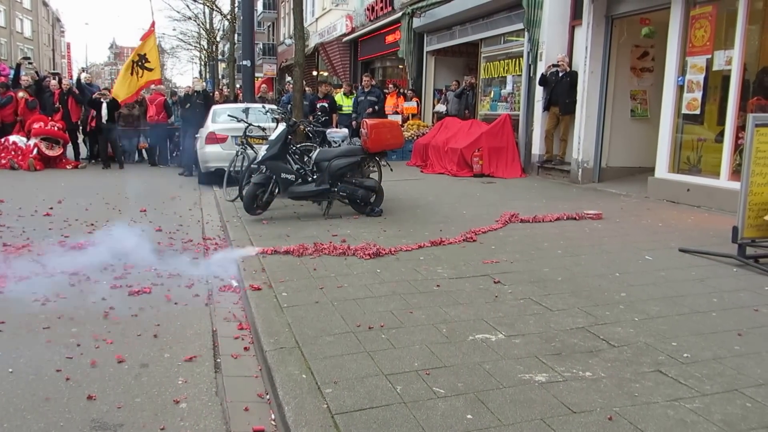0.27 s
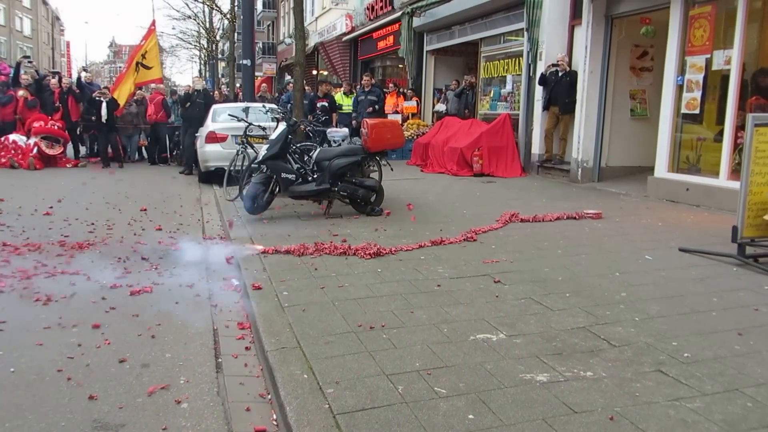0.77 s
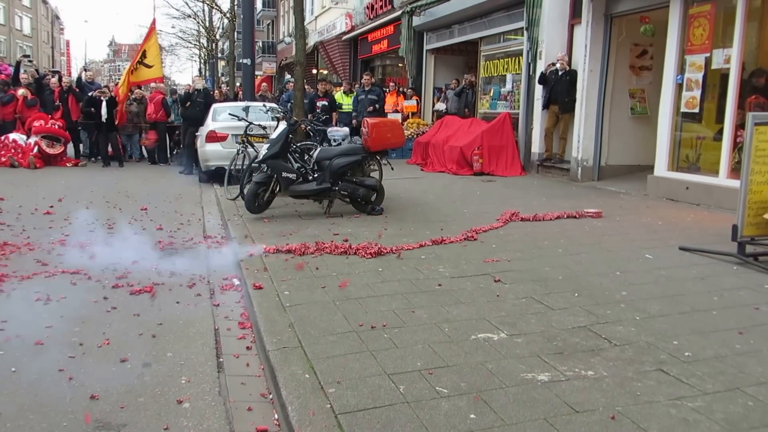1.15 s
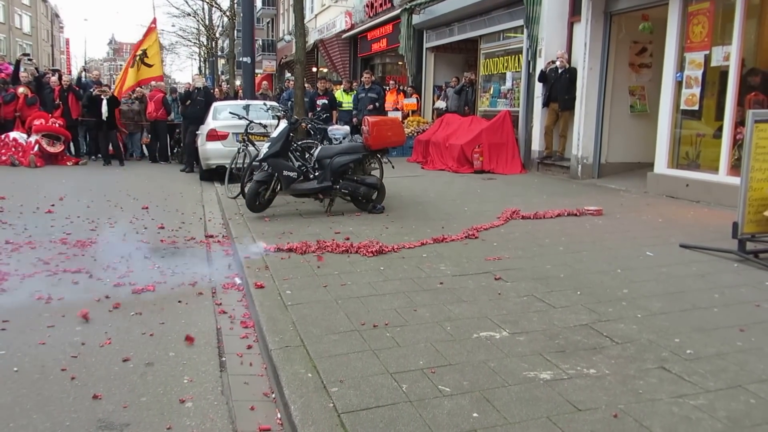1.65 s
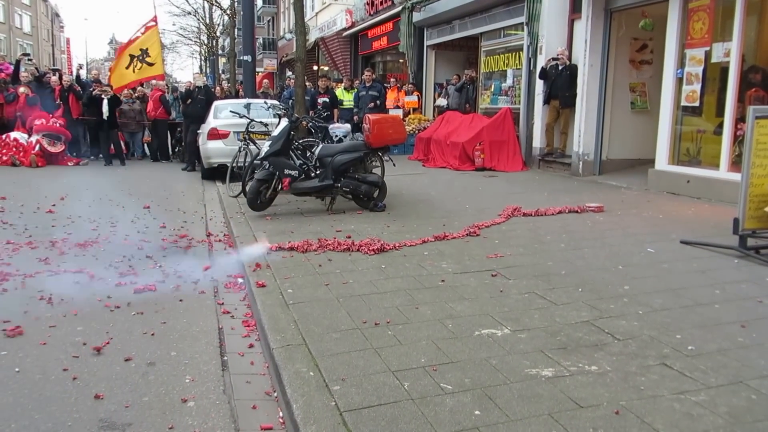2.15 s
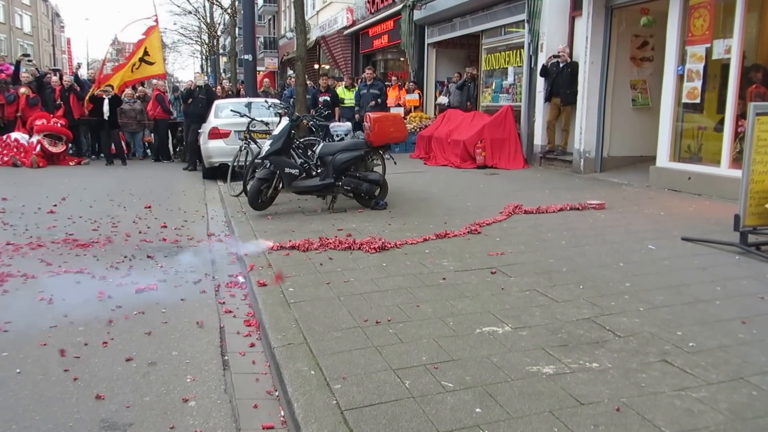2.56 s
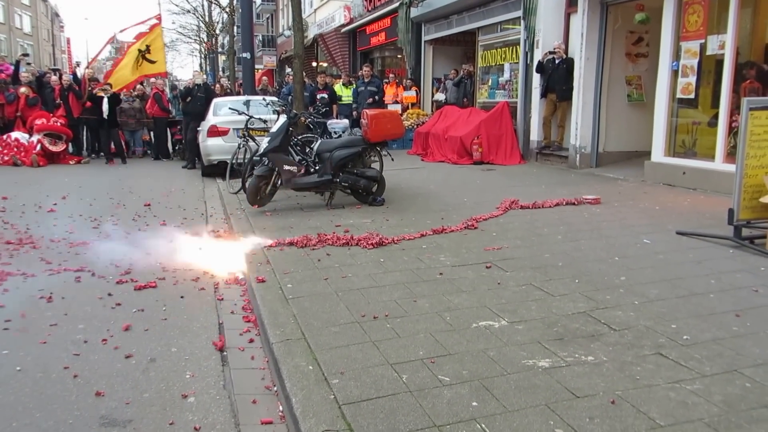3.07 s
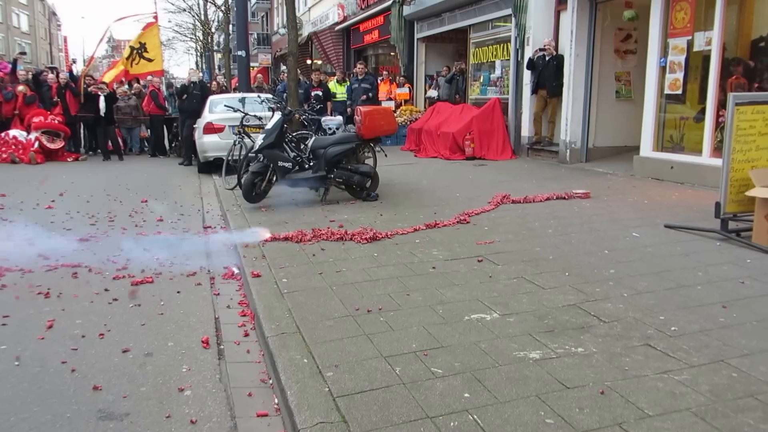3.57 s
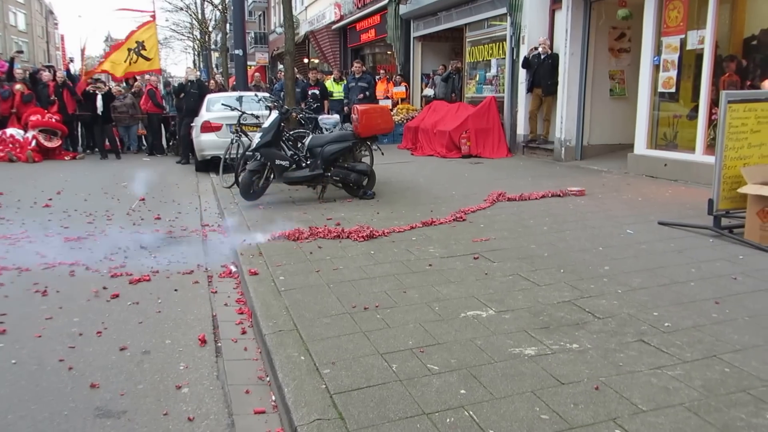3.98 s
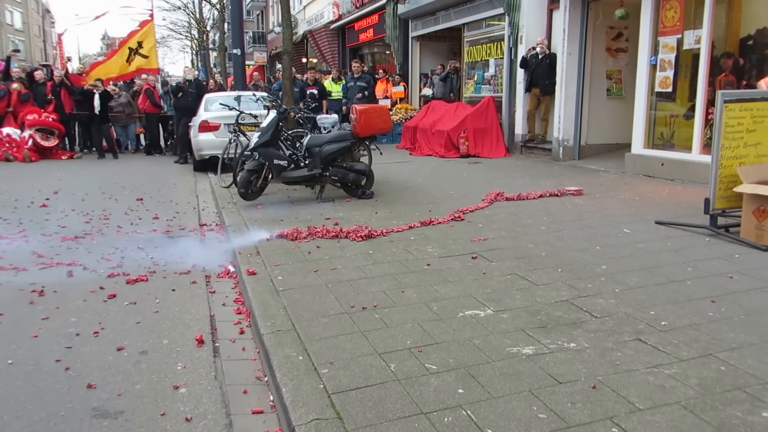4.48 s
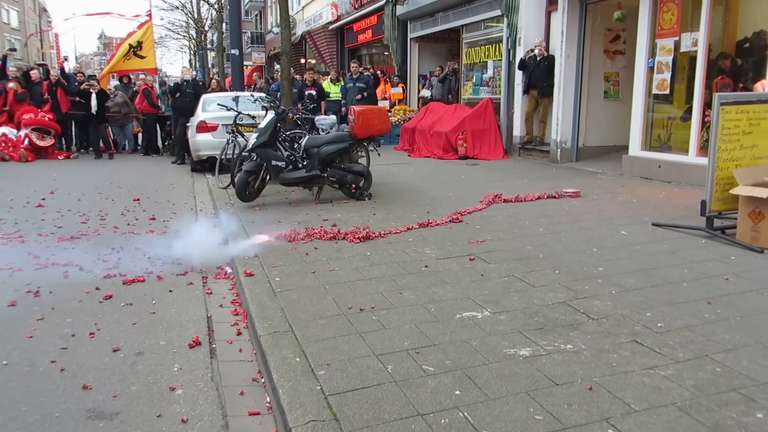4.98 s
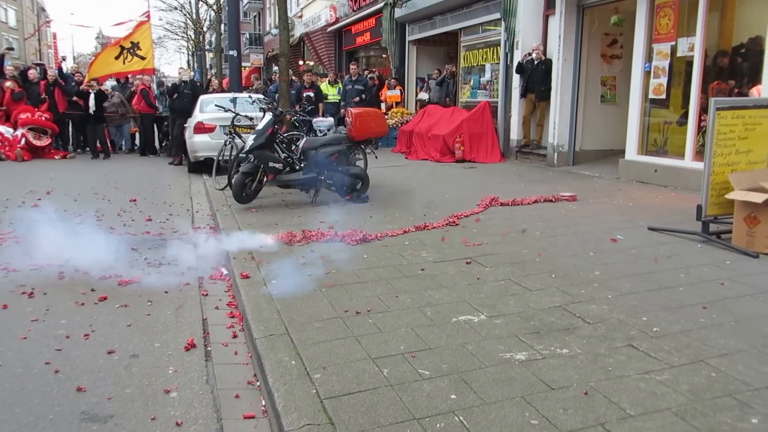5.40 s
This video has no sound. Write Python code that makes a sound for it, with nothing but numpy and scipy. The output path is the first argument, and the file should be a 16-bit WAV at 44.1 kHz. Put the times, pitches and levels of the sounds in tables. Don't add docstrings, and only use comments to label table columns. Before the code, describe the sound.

Firecrackers bang rapidly outdoors between buildings, so close that the microphone clips hard. Every burst starts with a sharp crack and tears into a gritty buzz that falls in pitch and breaks up into pulses. After a crowded first second, gaps open, revealing the street echo, dull wind pops, low buffeting, far traffic and a barely audible lens motor tick.

```python
import sys
import numpy as np
from scipy import signal
from scipy.fft import rfft, irfft, next_fast_len
from scipy.io import wavfile
from scipy.ndimage import uniform_filter1d, map_coordinates

SR = 44100
rng = np.random.default_rng(int(sys.argv[2]) if len(sys.argv) > 2 else 0)


def wrap_up_sound(samples):
    columns = np.atleast_2d(samples).T
    tamed = np.clip(columns, -1, 1)
    steps = np.round(tamed * 32767).astype(np.int16)
    wavfile.write(sys.argv[1], SR, steps)


def voltage_ratio(level):
    return 10 ** (np.asarray(level, float) / 20)


N = 248724


def along(points, hz):
    f, v = np.transpose(points)
    return np.interp(np.log(hz + 1), np.log(f + 1), v)


def unit(x):
    return x / np.sqrt(np.mean(x ** 2) + 1e-20)


def wobble(rate):
    knots = rng.standard_normal(int(N * rate / SR) + 4)
    return map_coordinates(knots, [np.arange(N) * rate / SR])


def coloured(x, spectrum):
    m = 2 * next_fast_len(N // 2 + 4096)
    gain = voltage_ratio(along(spectrum, np.fft.rfftfreq(m, 1 / SR)))
    cepstrum = irfft(np.log(gain + 1e-6), m)
    cepstrum = cepstrum * np.r_[1, np.full(m // 2 - 1, 2), 1, np.zeros(m // 2 - 1)]
    return irfft(rfft(x, m) * np.exp(rfft(cepstrum)), m)[..., :N]


def stereo(mid, side):
    return np.array([mid + side, mid - side])


# t/s, first rasp f/Hz, time on the rails/s,
# street echo level/dB
OVERRUN_CRACKERS = [(0.1398, 2598, 0.092, -21.5), (.477, 2503, 0.092, -27), (0.6159, 2101, .05, -24.5),
                    (.676, 1999, .07, -32), (.8093, 2700, .074, -24), (0.8936, 2197, .064, -32),
                    (0.9504, 2197, .045, -40), (1.0489, 2001, .05, -41), (1.207, 2305, .045, -28),
                    (3.2954, 2299, 0.061, -29), (4.1993, 2098, 0.059, -27), (4.9377, 2393, 0.085, -19),
                    (5.547, 3016, 0.16, -19), (5.61, 2500, .09, -27), (1.2597, 2600, .068, -27.5)]
# t/s, first rasp f/Hz, time on the rails/s (negative: a dull aftershock), fade/s,
# street echo level/dB
FADING_CRACKERS = [(-.08, 2000, 0.057, 0.019, -25), (.1942, 2200, 0.024, 0.12, -44),
                   (.5104, 2998, 0.071, 0.019, -25.5), (.7308, 1500, 0.016, 0.0074, -28.5),
                   (1.0067, 1400, 0.0062, 0.026, -29.5), (1.0586, 2302, 0.059, 0.025, -27.5),
                   (1.15, 900.3, -0.032, .054, -35), (1.3155, 1600, 0.0098, 0.0048, -35.5),
                   (1.88, 2405, 0.067, 0.068, -24.5), (2.0154, 2496, 0.069, 0.072, -25.5),
                   (2.4816, 1597, 0.053, .018, -31), (2.6816, 2201, .066, .025, -26.5),
                   (2.8653, 2795, .094, .112, -20.5), (3.16, 2401, 0.081, 0.055, -23.5),
                   (3.3209, 2504, 0.062, 0.024, -26.5), (3.8621, 2103, 0.061, .02, -30),
                   (3.9995, 2601, .12, .02, -19), (4.2663, 2501, .054, 0.048, -26.5),
                   (4.3679, 2296, 0.055, 0.04, -26.5), (4.9927, 2000, 0.027, .016, -42),
                   (5.1152, 2597, .081, 0.078, -21.5), (5.4448, 2392, .072, .022, -28)]


def blasts():
    usual_fade_s = .035
    overrun = [(s, hz, held, usual_fade_s, db) for s, hz, held, db in OVERRUN_CRACKERS]
    s, start_hz, held, fade, echo_db = np.transpose(sorted(FADING_CRACKERS + overrun))
    last_hz = 330.4 + (650 - 330.4) * np.exp(-fade / .022)
    sag = .75 + (1.5 - .75) * np.exp(-fade / .011)
    return np.transpose([s, start_hz, held, held + fade, last_hz, sag, echo_db])


# f/Hz, level/dB
BLAST_ROAR = [(150, -38.5), (500, -9.5), (1200, -2), (2000, 1), (3200, -5.5), (7000, -25.5), (14000, -29)]


def blast_pressure(age, start_hz, knee_hz, knee, late, rate, crack=.2):
    wall = (knee > 0) * np.exp(-((age - .0098) / .0018) ** 2)
    front = 1 + .6 * np.exp(-age / .0015) + .8 * wall
    jitter = voltage_ratio((2.2 - 1.2 * late) * wobble(260))
    place = np.cumsum(rate * front * jitter) / 2000 % (N - 1)
    roar = map_coordinates(unit(coloured(rng.standard_normal(N), BLAST_ROAR)), [place])
    hiss = coloured(rng.standard_normal((2, N)), [(300, 3.5), (2500, 22.5), (7000, -8.0), (16000, 0)])
    slaps = voltage_ratio(-60 * age / .11 + 5.3 * wall + 5.1 * wobble(180)) * (1 - late) ** 2
    shock_s = .00023
    shock = 6.2 * (age < shock_s) * (start_hz > knee_hz) * np.sin(2 * np.pi * age / shock_s)
    return roar + shock + crack * slaps * stereo(unit(hiss[0]), .11 * unit(hiss[1]))


# f/Hz, level/dB
PORT_DIFFERENCE = [(60, -1), (300, 18.5), (1500, 10.5), (4000, 12), (9000, 20.5), (15000, 19)]
# f/Hz, level/dB
MICROPHONE = [(20, -30.5), (60, -43.5), (200, -10), (500, -5.5), (1000, -1), (2500, -1.5), (6000, -4),
              (12000, -10), (15600, -17), (16600, -1), (20000, -79)]


def overload(knee_hz=1150, drive_db=14, rail_db=-9):
    table = blasts()
    t = np.arange(N) / SR
    last = np.searchsorted(table[:, 0], t, side="right") - 1
    s, start_hz, knee, settled, last_hz, sag, _ = table[last].T
    age = t - s
    early = np.clip(age / knee, 0, 1)
    late = np.clip((age - knee) / np.maximum(settled - knee, .002), 0, 1)
    rate = start_hz * (knee_hz / start_hz) ** early ** 1.6
    rate = rate * (last_hz / knee_hz) ** late ** .55
    rate = rate * (1 - .45 * late ** 3.5)
    pressure = blast_pressure(age, start_hz, knee_hz, knee, late, rate)
    depth, moment = rng.random((len(table), 2))[last].T
    suction = (5 * depth - 2.5) * np.exp(-((age - .0025 - .003 * moment) / .0011) ** 2)
    overdue = np.maximum(age - settled, 0)
    drift = late ** .33 * (sag + .45 * wobble(90)) + 300 * overdue
    boom = .38 * wobble(320) * (1 - late)
    drive = voltage_ratio(drive_db - 8.3 * early - 9 * np.sqrt(late))
    left, right = np.tanh(drive * (pressure + boom + suction - drift))
    onset = np.clip(age / np.where(knee > 0, .0001, .005), 0, 1)
    resting = np.exp(-(overdue / .0037) ** 2) * onset
    level = voltage_ratio(rail_db + 3.6 * np.exp(-age / .0023)) * resting
    mid, side = level * np.array([left + right, left - right]) / 2
    return stereo(*coloured([mid, coloured(side, PORT_DIFFERENCE)], MICROPHONE))


def recovery(level_db=-30, lead=.024, length=.0074):
    t = np.arange(N) / SR
    table = blasts()
    swell = np.zeros(N)
    for (s, _, _, settled, *_), after in zip(table, table[1:]):
        end = s + settled
        if end < after[0] + .02:
            swell += np.exp(-((t - end + lead / 2) / length) ** 2)
    lurch = [(15, -12), (35, 7.5), (90, 1.0), (250, 7.0), (450, -18.0), (900, -28), (3000, -110)]
    mid, side = unit(coloured(rng.standard_normal((2, N)), lurch))
    return voltage_ratio(level_db) * swell * stereo(mid, .067 * side)


# f/Hz, level/dB per Hz
STREET_ECHO = [(35, -50), (60, -15), (200, -9.5), (330, -9), (570, -1.5), (1200, -1.5), (3000, -7),
               (6300, -12.5), (10000, -17.5), (13000, -26.5), (15800, -32), (17000, -62)]
# f/Hz, t60/s
STREET_DECAY = [(150, 0.39), (700, 1), (2000, 1), (5000, 0.85), (13000, 0.33)]
# f/Hz, level/dB
DISTANT_WIDTH = [(60, -14), (150, -77), (380, -34), (950, -26.5), (2380, -15), (5980, -7.5), (15000, 8)]


def street(patchy_db=1.7, delay=.012):
    hz, t, noise = signal.stft(rng.standard_normal((2, N)), SR, nperseg=512)
    t60 = along(STREET_DECAY, hz)[:, None]
    power = 0
    for s, *_, db in blasts():
        age = t - delay - s
        power = power + (age > 0) * voltage_ratio(2 * db - 120 * np.maximum(age, 0) / t60)
    patches = uniform_filter1d(rng.standard_normal(power.shape), size=24, axis=0)
    patches = unit(uniform_filter1d(patches, size=4, axis=1))
    colour = voltage_ratio(along(STREET_ECHO, hz))[:, None]
    colour = colour / np.sqrt(np.mean(colour ** 2))
    gain = np.sqrt(power) * colour * voltage_ratio(patchy_db * patches)
    width = voltage_ratio(along(DISTANT_WIDTH, hz))[:, None]
    echo = signal.istft(noise * [gain, gain * width], SR, nperseg=512)[1]
    return stereo(*echo[:, :N])


# t/s, peak level/dB
PUFFS_ON_PORTS = [(1.461, -20), (1.496, -15), (1.614, -24.5), (1.649, -19), (1.675, -16), (1.689, -13),
                  (1.695, -24), (1.707, -18), (1.712, -14), (1.726, -24), (1.734, -22), (3.641, -23),
                  (4.855, -26)]


def puffs(hz=474, turns=.88):
    pops = np.zeros(N + SR)
    t = np.arange(SR // 20) / SR
    pop = np.sin(2 * np.pi * hz * t) * np.tanh(4 * hz * t)
    for s, db in PUFFS_ON_PORTS:
        pops[round(s * SR):][:len(t)] += voltage_ratio(db - 30 * t * hz / turns) * pop
    return stereo(pops[:N], .47 * pops[:N])


# f/Hz, level/dB per Hz
BUFFETING = [(18, -14), (40, -4.5), (110, -5), (200, -7.5), (400, -20), (1000, -66)]
# t/s, buffet level/dB
WIND_STRENGTH = [
    (0.0, -53),
    (0.82, -52),
    (2.56, -57.5),
    (3.11, -51),
    (3.66, -61),
    (4.21, -64),
    (4.73, -61.5),
    (5.07, -48),
    (5.64, -64),
]
# f/Hz, level/dB per Hz
PORT_FLUTTER = [(100, -30), (250, -5), (550, -2), (1000, -7), (2500, -40), (6000, -100)]


def wind(gust_db=4, flutter_db=-7, spikes_db=5.5):
    mid, side = unit(coloured(rng.standard_normal((2, N)), BUFFETING))
    strength_db = np.interp(np.arange(N) / SR, *np.transpose(WIND_STRENGTH))
    gusts = voltage_ratio(strength_db + gust_db + .8 * wobble(6.4))
    spiky = voltage_ratio(spikes_db * wobble(120)) * rng.standard_normal((2, N))
    ticking = unit(coloured(spiky, PORT_FLUTTER))
    return gusts * stereo(mid, .078 * side) + voltage_ratio(flutter_db) * gusts * ticking


# f/Hz, level/dB per Hz
DISTANT_TRAFFIC = [(120, -17.5), (200, -2.5), (289, 4), (322, 0), (448, -7.5), (709, -4.5), (1910, -8.5),
                   (2050, -23), (2210, -6), (9580, -34), (12400, -48), (16000, -59)]


def traffic(level_db=-52):
    mid, side = coloured(rng.standard_normal((2, N)), DISTANT_TRAFFIC)
    side = coloured(side, DISTANT_WIDTH)
    return voltage_ratio(level_db + wobble(6.773)) * stereo(mid, side) / np.std(mid)


# f/Hz, level/dB per Hz
CAMERA_HISS = [(8000, -42), (10800, -8), (12200, 4), (13200, -4), (15500, -13.5), (17000, -37)]


def lens_motor(level_db=-76, ticks_per_s=52, tick_s=.003):
    hiss = unit(coloured(rng.standard_normal((2, N)), CAMERA_HISS))
    turn = np.cumsum(ticks_per_s * voltage_ratio(1.2 * wobble(3))) / SR % 1
    ticks = .5 + 2.8 * np.exp(-turn / (ticks_per_s * tick_s))
    waking = np.arange(N) > 2.1 * SR
    return waking * voltage_ratio(level_db + 2.7 * wobble(40)) * ticks * hiss


def scene():
    return overload() + recovery() + street() + puffs() + wind() + traffic() + lens_motor()


def band_limit(x):
    return signal.sosfilt(signal.butter(12, 16750, fs=SR, output="sos"), x)


# f/Hz, level/dB
RECORDER_BAND = [(20, 0), (15600, 0), (15900, -33), (16700, -38), (17200, -70)]


def record(dry):
    rounded = dry / (1 + np.abs(dry / .8) ** 4) ** (1 / 4)
    mix = coloured(rounded, RECORDER_BAND)
    return band_limit(mix)


dry = scene()
out = record(dry)
wrap_up_sound(out)
```